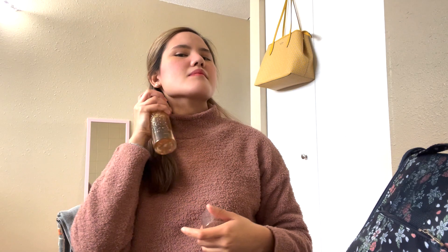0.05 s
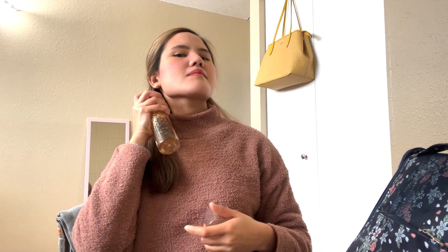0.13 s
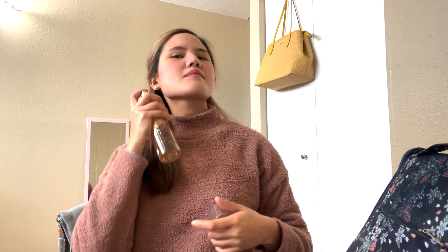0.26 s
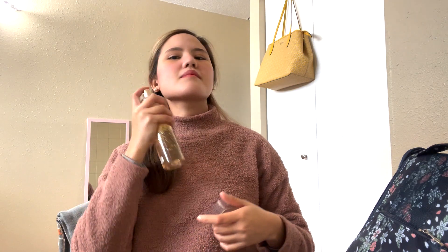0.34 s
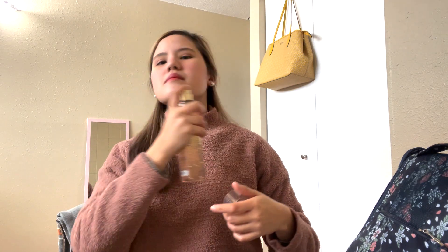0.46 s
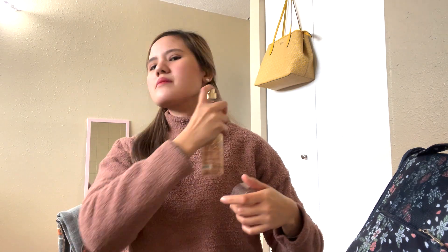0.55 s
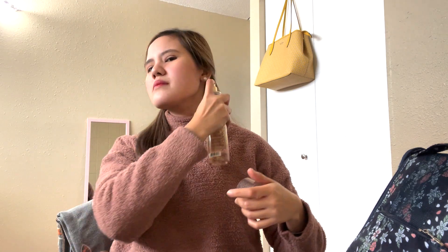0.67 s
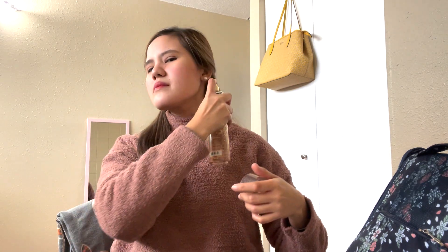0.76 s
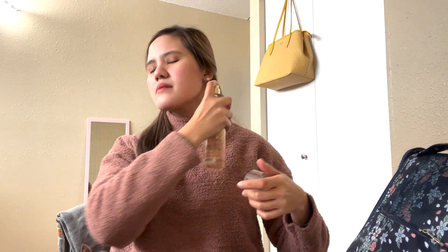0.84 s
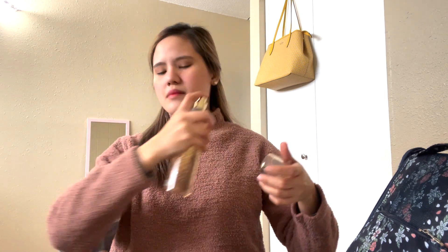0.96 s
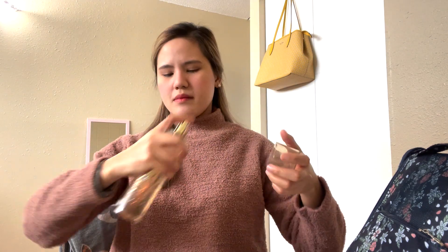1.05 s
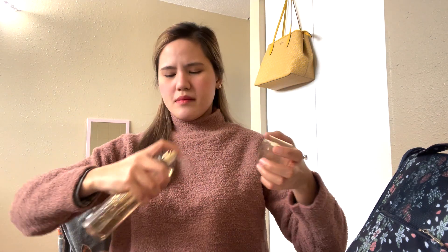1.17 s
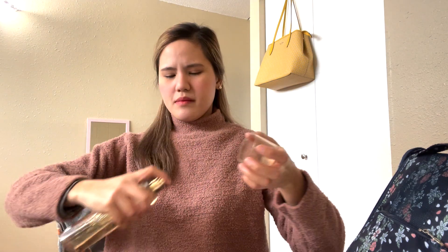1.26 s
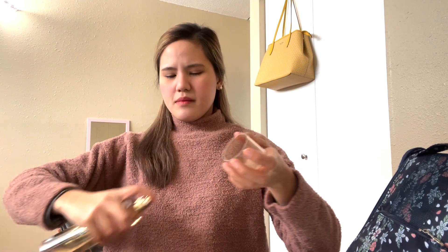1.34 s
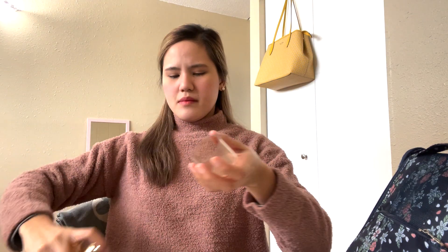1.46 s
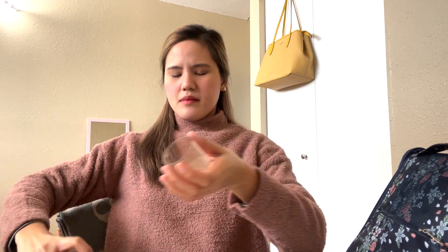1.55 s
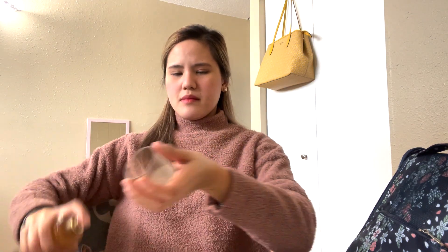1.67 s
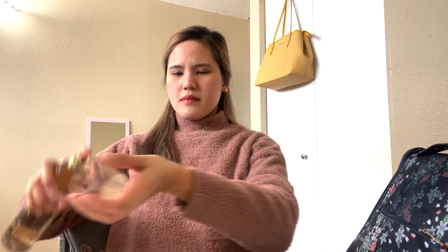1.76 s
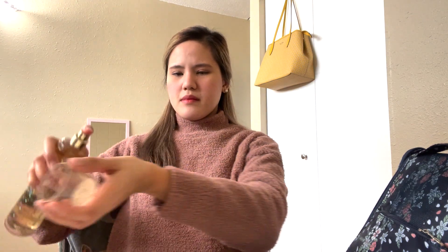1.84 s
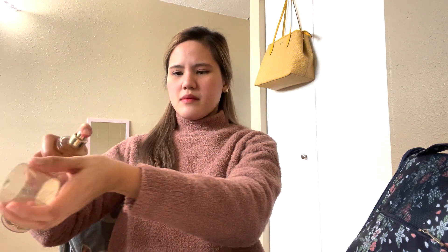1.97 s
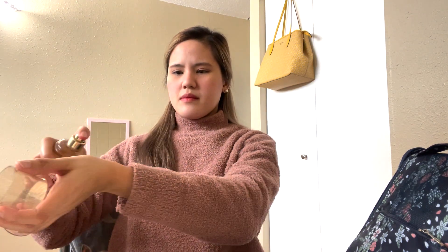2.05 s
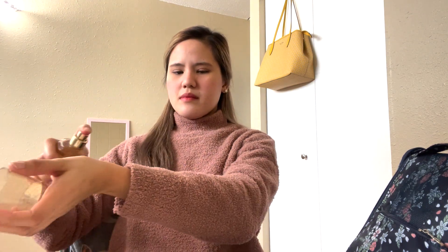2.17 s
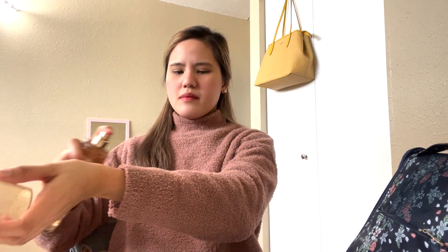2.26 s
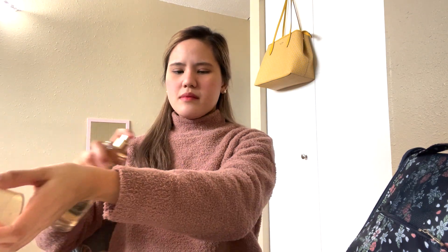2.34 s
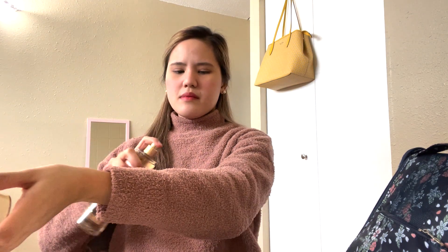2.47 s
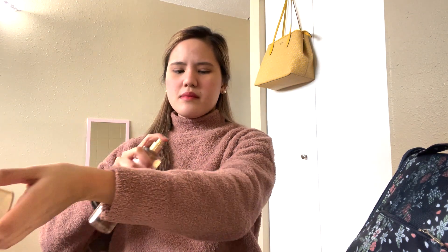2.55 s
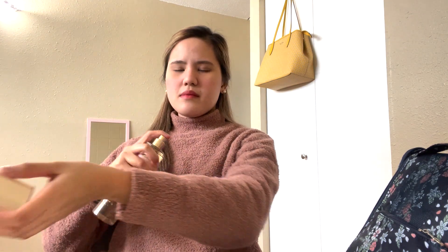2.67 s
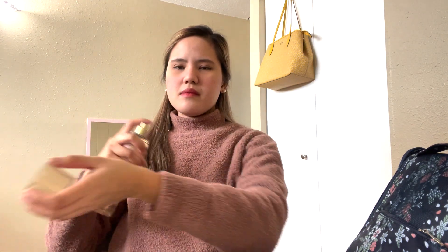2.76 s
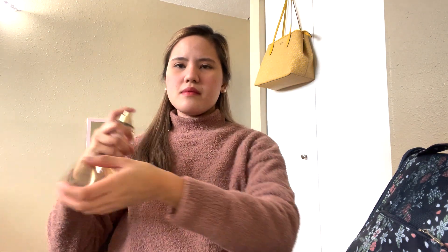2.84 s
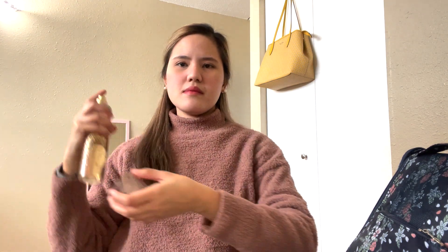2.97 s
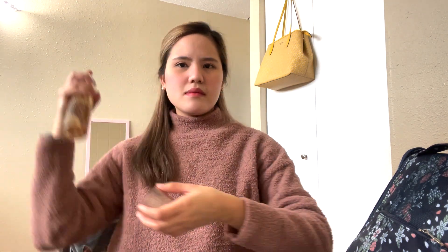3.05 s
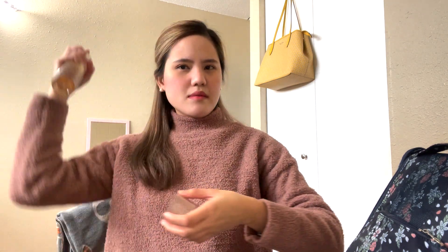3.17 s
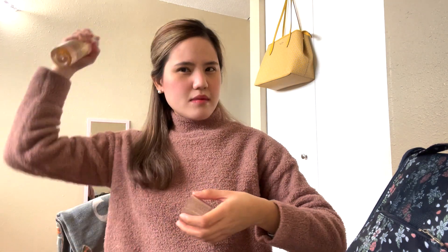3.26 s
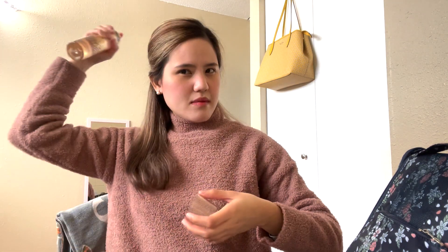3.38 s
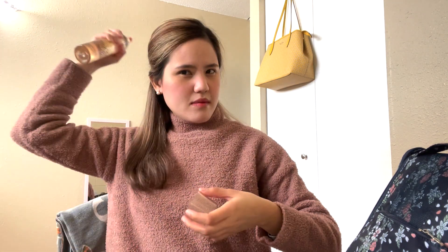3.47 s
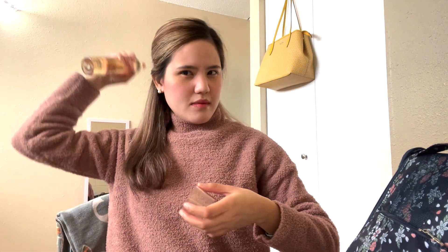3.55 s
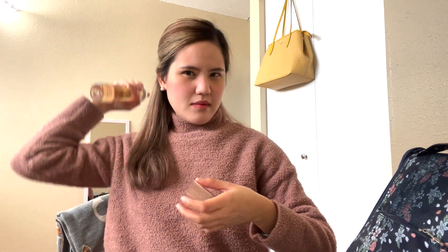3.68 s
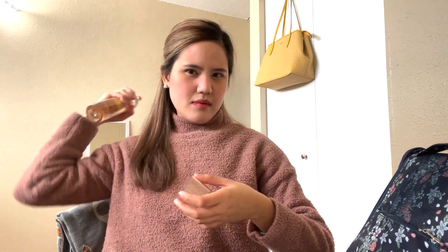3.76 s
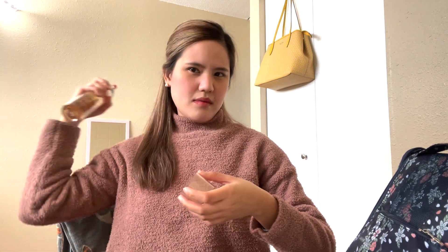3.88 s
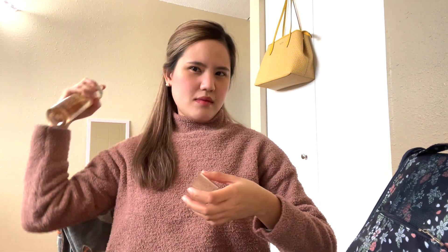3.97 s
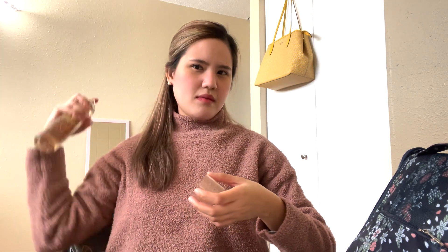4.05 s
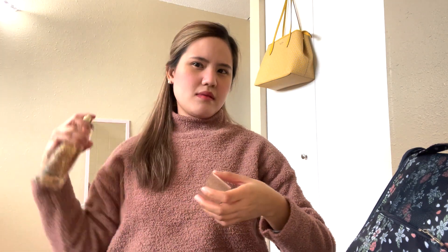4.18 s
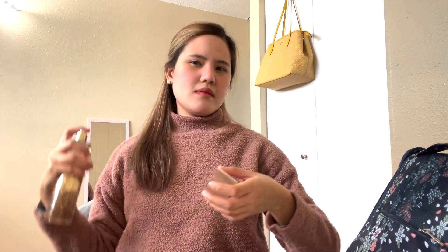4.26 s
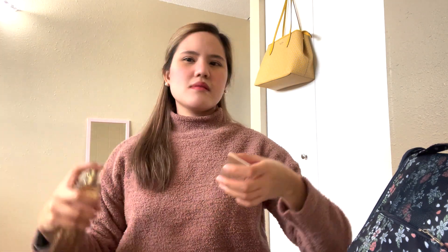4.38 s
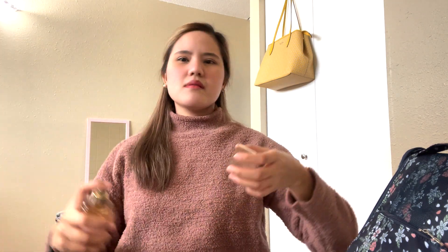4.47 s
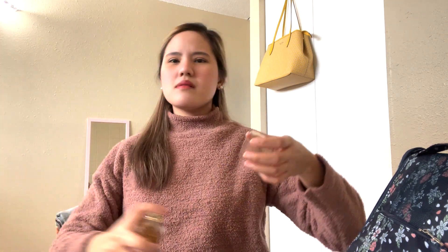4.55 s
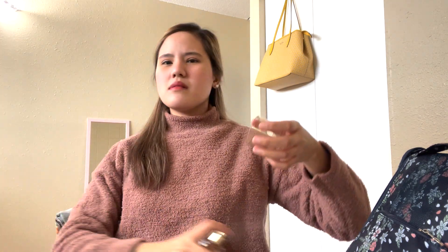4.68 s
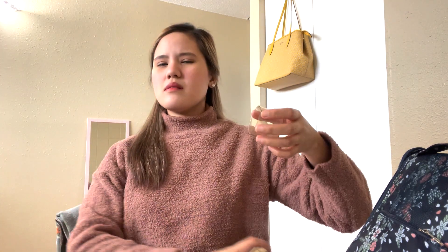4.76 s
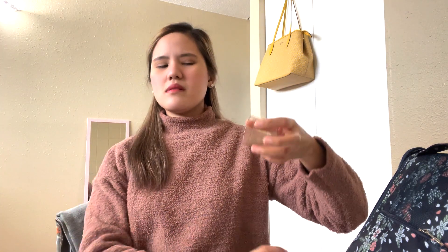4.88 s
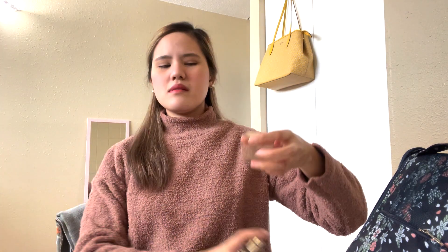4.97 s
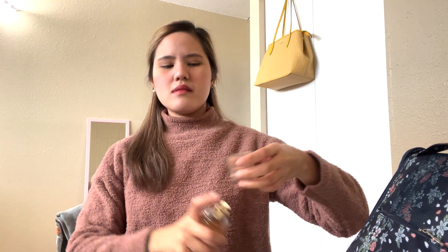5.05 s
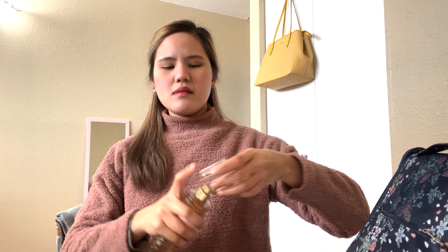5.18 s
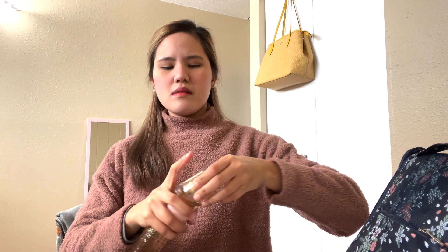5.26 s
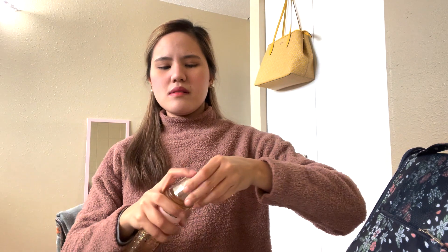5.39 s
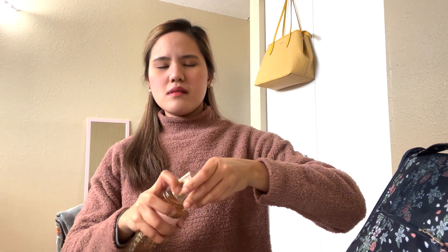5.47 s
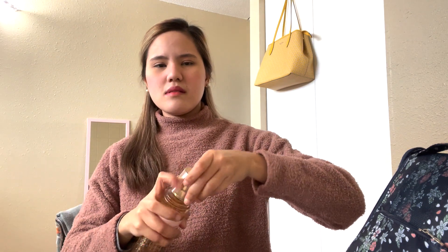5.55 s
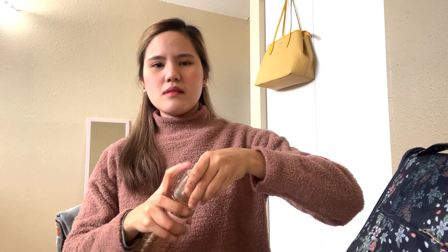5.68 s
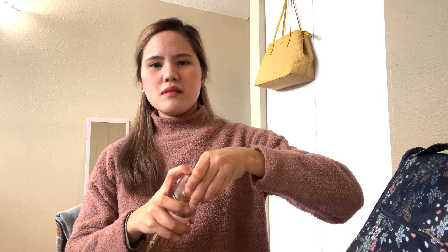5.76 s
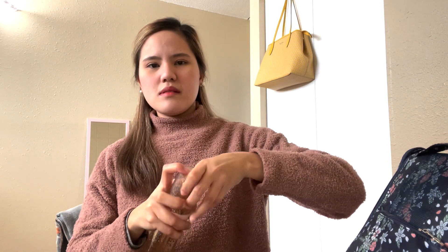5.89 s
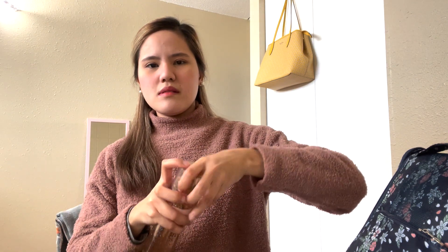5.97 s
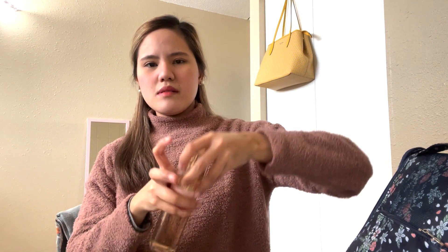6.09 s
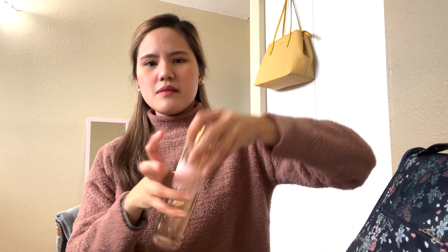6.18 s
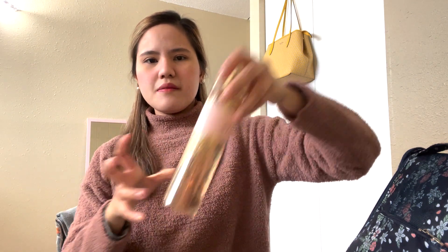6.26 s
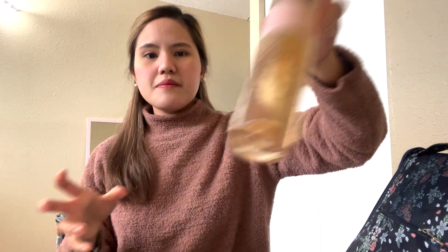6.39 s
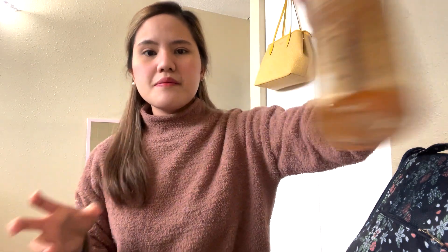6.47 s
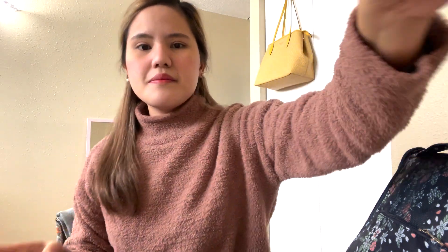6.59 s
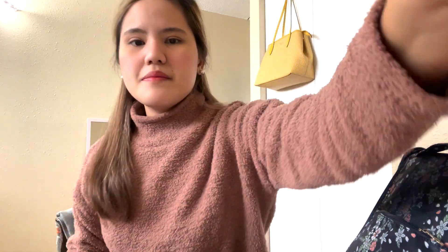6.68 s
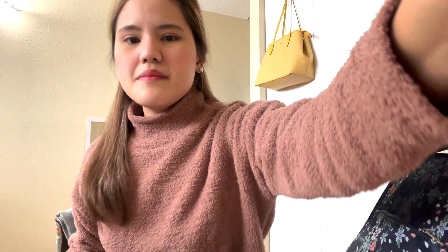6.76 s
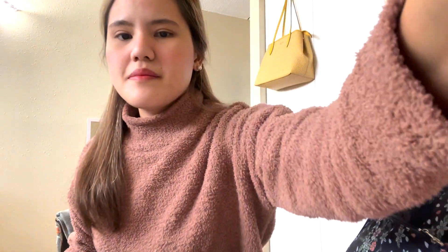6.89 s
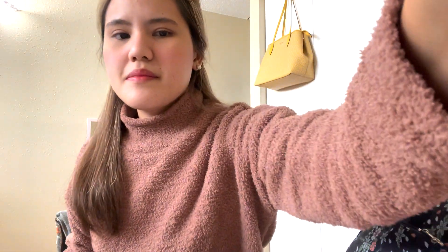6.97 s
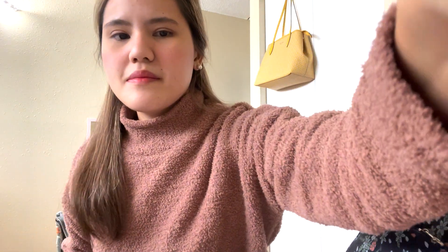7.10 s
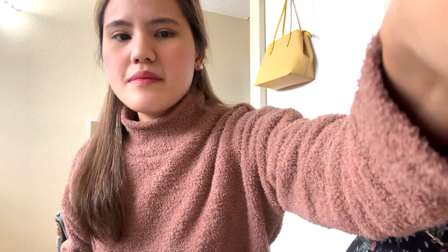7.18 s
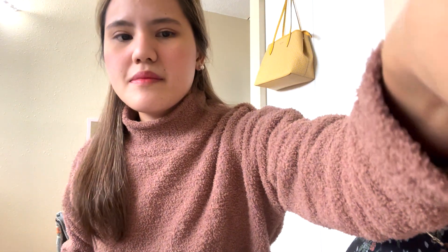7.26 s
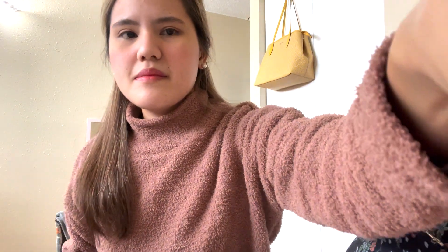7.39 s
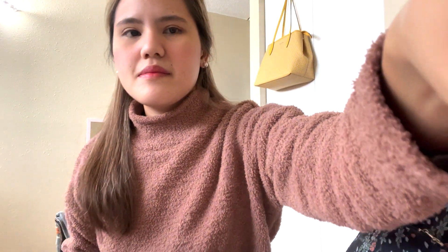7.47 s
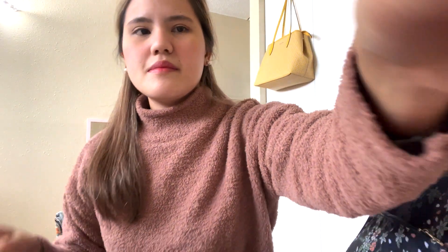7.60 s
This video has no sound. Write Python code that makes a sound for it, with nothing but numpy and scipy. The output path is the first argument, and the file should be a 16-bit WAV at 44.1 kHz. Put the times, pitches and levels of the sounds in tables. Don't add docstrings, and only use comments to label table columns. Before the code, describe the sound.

A quiet bedroom with a faint, steady low hum, heard close by in stereo. At once a pump clicks, glass clinks and a short spritz of fine, bright mist hisses with a thin whistle. More spritzes follow at about 0.6, 1.1, 1.4, 1.9 and 2.3 seconds, the one at 1.9 strongest, each with small valve and piston clicks; a slight bump comes with it. After a pause come sprays at 3.2 and 3.5, a fingernail tick on glass at 3.8, and final sprays at 4.1 and 4.5. Around 5.2 a hollow plastic cap knocks the collar in a quick cluster, taps again at 5.55, and snaps on sharply at 5.8. A sleeve rustles softly from 6.1, swelling near 6.7. At 7.2 a hand bumps the stand with two heavy, low thumps, followed by light handling rumble. Short flutter echoes surround the sounds.

```python
import sys
import numpy as np
from scipy import signal
from scipy.fft import rfft, irfft, next_fast_len
from scipy.io import wavfile
from scipy.ndimage import uniform_filter1d

SR = 44100
rng = np.random.default_rng(int(sys.argv[2]) if len(sys.argv) > 2 else 0)


def transcribe(u):
    v = np.clip(np.atleast_2d(u).T, -1, 1)
    q = np.round(v * 32767).astype(np.int16)
    wavfile.write(sys.argv[1], SR, q)


def rack_gain(trim_db):
    fader = np.asarray(trim_db, float)
    return 10 ** (fader / 20)


N = 336483


def read(points, hz):
    f, value = np.transpose(points)
    return np.interp(np.log(hz + 1), np.log(f + 1), value)


def evened(x):
    return x / np.sqrt(np.mean(x ** 2) + 1e-20)


def add(mix, s, sound):
    part = mix[round(s * SR):][:len(sound)]
    part += sound[:len(part)]


def coloured(x, points, turn=1):
    size = next_fast_len(x.shape[-1])
    gain = rack_gain(read(points, np.fft.rfftfreq(size, 1 / SR)))
    return irfft(rfft(x, size) * gain * turn, size)[..., :x.shape[-1]]


def hiss(points, channels=1):
    return evened(coloured(rng.standard_normal((channels, N)), points))


def fuzzy(hz, width, channels=1):
    size = next_fast_len(N)
    off = 2 * (np.fft.rfftfreq(size, 1 / SR) - hz) / width
    spectrum = rfft(rng.standard_normal((channels, size)))
    return evened(irfft(spectrum / (1 + off ** 2), size)[:, :N])


def swells(rows, over_db=0):
    out = np.zeros(N)
    for (s, rise, fall, db, *_), more_db in zip(rows, over_db + np.zeros(len(rows))):
        rise, fall = max(rise, .002), max(fall, .01)
        t = np.arange(0, rise + 2 * fall, 1 / SR)
        below_db = 20 * np.maximum(1 - t / rise, (t - rise) / fall)
        add(out, s, rack_gain(db + more_db - below_db) * np.minimum(t / .002, 1))
    return out


def knocks(events, edges, smear_s, steep):
    out, hz = np.zeros(N), np.fft.rfftfreq(2048, 1 / SR) + 1
    lead_s = 300 / SR
    parts = []
    for lo, hi in edges:
        band = 1 / np.sqrt((1 + (lo / hz) ** steep) * (1 + (hz / hi) ** steep))
        parts.append(band * SR / (4 * (hi - lo)))
    for s, db, *rel_db in events:
        scatter = abs(evened(uniform_filter1d(rng.standard_normal(len(hz)), size=30)))
        delay = smear_s * scatter + 2.761 / (hz + 450) + lead_s
        shape = np.sqrt(sum((rack_gain(r) * p) ** 2 for r, p in zip([0] + rel_db, parts)))
        phase = -2j * np.pi * np.cumsum(delay) * SR / 2048
        add(out, s - lead_s, rack_gain(db + 2.5) * irfft(shape * np.exp(phase)))
    return out


# hz, level_db (per Hz)
HOUSE_FLOOR = [(12, -63), (20, -29.5), (43, -8.5), (111, -5.5), (169, -5), (218, -4.5), (289, -18.5),
               (428, -26), (465, -37), (966, -42), (1390, -43), (1840, -39.5), (2810, -48), (5070, -52),
               (16500, -64.5)]
# pitch_hz, width_hz, level_db
ROOM_HUM = [(55.5, 11, -63.5), (95, 7.6, -63.5), (137, 7.5, -59), (161.7, 2, -58.5), (209.7, 8.9, -66),
            (1010, 84, -85)]


def house():
    floor_db = -50.5
    hum = sum(rack_gain(db) * fuzzy(hz, width, channels=2) for hz, width, db in ROOM_HUM)
    return rack_gain(floor_db - 6.5) * hiss(HOUSE_FLOOR, channels=2) + hum


# start_s, rise_s, fall_s (for 20 dB), fibres_db, drag_db (relative to fibres)
RUSTLES = [(6.074, 0.0065, 0.3, -71, -4), (6.44, 0.22, 0.07, -74, 3.5), (6.69, 0.025, 0.1, -62, 7),
           (6.719, 0.018, 0.45, -77, 21.5), (6.7, 0.04, -0.7, -89.5, 29), (8.7, .01, 0.4, -83, 20),
           (6.5, 0.011, -0.08, -85.5, 24), (7.25, 0.11, 8, -72, 5), (7.4, 0.074, 0.7, -69.5, 10)]
# hz, level_db (per Hz)
CLOTH_COLOUR = [(290, -20), (500, -17), (676, -15), (1080, -4), (1690, -9.5), (2690, -6.5), (2880, -9),
                (8000, -17.5), (10400, -69), (17600, -120)]
# start_s, rise_s, fall_s (for 20 dB), level_db
MIST_LEAK = [
    (6.1, 0.028, 0.07, -74),
]


def rustle():
    grain = rack_gain(0.65 * evened(uniform_filter1d(rng.standard_normal(N), size=300)))
    fibres, fizz = hiss(CLOTH_COLOUR, channels=2), hiss(MIST_COLOUR, channels=2)
    drag = fuzzy(275, 200, channels=2)
    cloth = swells(RUSTLES) * (fibres + rack_gain(-19) * fizz)
    dragging = swells(RUSTLES, np.array(RUSTLES)[:, 4]) * drag
    return grain * (cloth + swells(MIST_LEAK) * fizz + dragging)


# start_s, level_db, pitch_hz, t60_s
STAND_THUMPS = [(0.03, -45.5, 132.3, 0.67), (1.882, -30, 218.5, 0.078), (5.774, -23.5, 244.4, 0.1),
                (5.786, -31.5, 145.4, 0.29), (6.731, -38, 152.4, 0.12), (6.757, -38.5, 133.3, 0.17),
                (6.901, -40, 137, 0.077), (7.2066, -10.5, 104.7, 0.085), (7.2521, -11.5, 112.7, 0.076),
                (7.286, -34, 110.5, 0.31), (7.483, -44.5, 115, 0.18)]
# start_s, rise_s, fall_s (for 20 dB), level_db
HANDLING_RUMBLE = [
    (7.27, 0.02, 0.3, -42),
    (7.475, 0.015, 0.16, -43.5),
]


def thumps():
    out, t = np.zeros(N), np.arange(SR // 2) / SR
    for s, db, hz, t60 in STAND_THUMPS:
        rise = (1 - np.exp(-t / 0.0052)) ** 2
        add(out, s, rack_gain(db + 1.5 - 60 * t / t60) * rise * np.sin(2 * np.pi * hz * t))
    return out * np.array([[1], [-.45]]) + swells(HANDLING_RUMBLE) * fuzzy(98.6, 69, channels=2)


# start_s,
# knock_db, brightness_db
VALVE_CLICKS = [(.068, -34.5, -4), (.591, -47, -13), (1.099, -47.5, -13), (1.874, -45, -9), (2.3, -50, -8),
                (3.234, -64, 8), (3.522, -61, 5), (4.069, -49, -3), (4.525, -47.5, -9), (7.204, -49.5, -11)]
PISTON_RETURNS = [(.027, -29, 5.5), (.802, -42, 6.5), (1.299, -45, 9.5), (1.993, -38.5, -8),
                  (2.073, -36, 3), (2.403, -33, 0), (2.483, -42, 8.5), (3.33, -46, 11), (3.393, -43.5, 13),
                  (4.179, -33, -2.5), (4.282, -39.5, 2), (4.639, -32.5, -1.5), (6.447, -63, 5.5),
                  (6.693, -50, -14), (6.874, -47, -18), (7.199, -38, 7.5), (7.215, -67, -8),
                  (7.235, -65, -13), (7.473, -48, 5)]
NAIL_TICKS = [
    (3.82, -63.5, 0.1),
    (4.428, -82.5, 0.012),
]
FLICKS = [(2.757, -69, 2.5), (2.914, -73.5, -1), (3.493, -59, -4), (4.487, -66, -4.5), (5.069, -74, -4),
          (7.315, -70, -1.5)]
# tap_db, tick_db, fizz_db (relative to the knock)
VALVE_COLOUR = (-14.5, 0, -5)
RETURN_COLOUR = (-5.5, -13.5, -22.5)
NAIL_COLOUR = (14, 28.5, -28)
FLICK_COLOUR = (-12, -8, 13)
# tap, tick, fizz (dB per dB)
BRIGHT_FOLLOWS = (0.67, 0.52, 1)
# low_hz, high_hz
CLICK_BANDS = [(300, 1190), (1350, 2370), (2450, 4000), (8800, 11600)]


def clicks():
    kinds = [(VALVE_CLICKS, VALVE_COLOUR), (PISTON_RETURNS, RETURN_COLOUR),
             (NAIL_TICKS, NAIL_COLOUR), (FLICKS, FLICK_COLOUR)]
    events = []
    for rows, colour in kinds:
        for s, db, bright in rows:
            events.append((s, db, *(np.array(colour) + bright * np.array(BRIGHT_FOLLOWS))))
    return knocks(events, CLICK_BANDS, smear_s=.0009, steep=7.9)


# pitch_hz, level_db, t60_s, spread (0-1)
CAP_RING = [(1420, 0.5, .045, 0.04), (1132, -9.5, 0.048, 0), (1248, -8.5, 0.034, 0.05),
            (2129, -10, 0.14, 0.01), (1880, -12.5, 0.037, 0), (830, -20, 0.046, 0.04),
            (576.2, -19.5, 0.052, 0.01), (402, -21, 0.029, 0), (3400, -24, 0.017, 0)]
SNAP_RING = [(1950, 10, 0.024, 0.07), (2200, 3, .02, 0.052), (3810, -0.5, 0.012, 0.25),
             (10700, 15, .0035, .08), (11980, 15, .0035, 0.09), (13300, 18.5, 0.0043, 0.07),
             (2780, -0.5, 0.015, 0.12), (4320, -3, .015, 0.044), (463, -7.5, 0.033, 0.16),
             (348, -10.5, 0.13, 0.3)]
PUMP_RING = [(889, -1.5, 0.15, .12), (499, -1.5, 0.035, 0.11), (1340, -8.5, 0.033, 0.31)]
GLASS_RING = [(3510, 1, 0.033, 0.011), (3130, -3, 0.023, 0.025), (2970, -10, 0.018, 0.032),
              (3710, -12.5, .02, .03)]
# start_s, level_db, pitch_hz (main mode), tilt_db (per
CAP_HITS = [(5.165, -15.5, 1420, 1), (5.1678, -20.5, 1395, -0.5), (5.189, -23, 1317, -3),
            (5.205, -30.5, 1400, 0.5), (5.548, -24, 1340, -1), (5.575, -30, 1319, -3),
            (5.7787, -21.5, 1300, 0)]
SNAP_HITS = [
    (5.777, -16.5, 1950, 0.11),
]
PUMP_HITS = [(.027, -38, 970, -12.5), (.70, -53, 978, 9), (.802, -54, 904, -7.5), (1.993, -44, 896, 5),
             (2.405, -45, 932, -0.5), (3.331, -49.5, 936, 5), (4.18, -54.5, 1010, -6.5),
             (4.283, -55, 990, 8), (4.641, -43.5, 1111, 0.5)]
GLASS_HITS = [(0.027, -38.5, 3400, -5), (.057, -41.5, 3490, 4), (.0685, -32, 3470, 0.1),
              (.0712, -28, 3510, 0.1)]
# start_s, level_db, pitch_hz, t60_s, spread (0-1)
LIGHT_TOUCHES = [(.016, -49, 617, 0.05, 0.23), (.59, -57.5, 440, 0.055, 0), (1.19, -44, 660, 0.028, 0.39),
                 (1.31, -50, 1168, 0.24, .3), (1.42, -48, 1090, 0.13, 0.28), (1.89, -44.5, 274, 0.11, 0.16),
                 (2.074, -48.5, 3580, 0.021, 0.03), (2.2, -72, 246, 0.1, 0.26),
                 (2.484, -56, 3650, .02, .05), (.802, -58, 3470, .025, 0.01), (1.24, -58, 3450, .03, 0.02),
                 (1.312, -50.5, 1750, .04, .04), (2.652, -77, 2740, .12, 0),
                 (2.672, -62.5, 2525, .15, 0.04), (2.692, -67, 1776, .15, 0.01),
                 (2.718, -66.5, 1950, .15, 0.03), (3.331, -54, 2420, .03, 0),
                 (3.7, -54.5, 3510, .025, 0.01), (4.428, -61, 4150, 0.016, 0.03),
                 (4.487, -53, 3600, .01, 0.06), (4.548, -57, 1424, .06, .04),
                 (5.4245, -53.5, 3480, .02, 0.03), (5.574, -38, 2510, .02, .04),
                 (5.574, -37, 3520, .02, 0.03), (5.574, -38, 4180, .02, 0.01), (.027, -39, 592, .06, 0.08),
                 (2.711, -52, 250, 0.18, 0.09), (2.865, -80.5, 2530, 0.27, 0),
                 (3.125, -62.5, 552, .1, 0.06), (3.16, -64, 964, 0.09, 0.17),
                 (3.395, -49, 1600, 0.035, 0.16), (3.82, -39.5, 3100, 0.022, 0.21),
                 (3.82, -41.5, 6170, 0.0075, 0.03), (3.82, -56, 1484, 0.033, 0.04),
                 (4.81, -68.5, 1880, 0.051, 0.1), (6.447, -64, 1810, .04, 0.04),
                 (7.199, -32.5, 522, .03, 0.22), (7.199, -40, 1880, 0.015, 0),
                 (7.297, -47, 2210, 0.023, 0.1), (7.316, -52, 1950, .03, 0.03)]


def rings():
    out, t = np.zeros(N), np.arange(8192) / SR
    parts = [(CAP_RING, CAP_HITS), (SNAP_RING, SNAP_HITS), (PUMP_RING, PUMP_HITS), (GLASS_RING, GLASS_HITS)]
    struck = []
    for modes, blows in parts:
        usual_hz = modes[0][0]
        for s, db, main_hz, tilt in blows:
            for hz, mode_db, t60, spread in modes:
                level_db = db + mode_db + tilt * np.log2(hz / usual_hz)
                struck.append((s, level_db, hz * main_hz / usual_hz, t60, spread))
    struck += LIGHT_TOUCHES
    offsets = np.linspace(-.85, .85, 6) + rng.uniform(-.15, .15, (len(struck), 6))
    for (s, db, hz, t60, spread), off in zip(struck, offsets):
        around = np.sin(2 * np.pi * hz * (1 + spread * off[:, None]) * t).sum(0)
        cluster = np.sin(2 * np.pi * hz * t) + 0.86 * around
        decay_db = np.minimum(60 * t / max(t60, .001), 200)
        add(out, s, rack_gain(db - 10.5 - decay_db) * (1 - np.exp(-t / 0.001)) * cluster)
    return out


# start_s, body_db, then rim_db, tick_db, fizz_db
CAP_CONTACTS = [(5.1365, -42.5, 1.5, -6.5, -27.5), (5.162, -50, -2, -0.5, -3),
                (5.1651, -21, -8, -18, -21.5), (5.1675, -17, -18.5, -10.5, -17.5),
                (5.1889, -12.5, -23.5, -9.5, -19.5), (5.205, -29.5, -7, 1, -0.5),
                (5.3596, -43.5, -1.5, 10, 4), (5.377, -48.5, -1.5, -10, -16), (5.4245, -48, -5, 6, -6),
                (5.5469, -20.5, -20, -10, -20), (5.5734, -25.5, -4, -0.5, -3), (5.771, -44, 4.5, 5, -35),
                (5.7769, -14, 4, 10.5, -2.5)]
# low_hz, high_hz
CAP_BANDS = [(920, 1280), (133, 490), (1600, 2510), (2630, 5870), (10130, 10990)]


def cap():
    dull_db = -25
    events = [(s, db, dull_db, *rel_db) for s, db, *rel_db in CAP_CONTACTS]
    return knocks(events, CAP_BANDS, smear_s=0.001307, steep=9.8)


# start_s, rise_s, hold_s, pressure_db, whistle_hz
PUMP_STROKES = [(0.029, .012, 0.043, -52.5, 3270), (0.595, .034, 0.049, -54.5, 2720),
                (1.101, .036, .003, -53.5, 2750), (1.296, .016, 0.014, -65, 2780),
                (1.37, .04, 0.024, -52, 2820), (1.877, .03, 0.037, -47, 2960),
                (2.299, .026, 0.034, -51.5, 2730), (3.236, .045, 0.0028, -52.5, 2892),
                (3.518, .065, 0.026, -52, 2790), (4.068, .026, 0.05, -54.5, 2980),
                (4.527, .016, 0.055, -55, 2950)]
# hz, level_db (per Hz)
MIST_COLOUR = [(4410, -47), (7500, -14), (10600, 1.5), (13100, -4.5), (14300, -1.5), (16100, -11),
               (16300, -29.5), (16500, -63.5)]
# hz, level_db (per Hz)
JET_COLOUR = [(240, -28.5), (400, -10.5), (950, -19.5), (1180, -18.5), (1370, -13), (1490, -16.5),
              (2650, -9), (6070, -13), (7240, -10.5), (8000, -9.5), (10400, -35), (17600, -120)]
# time_s, jet_db
NOZZLE_AIM = [(.05, 5), (.64, -1), (1.14, 2.5), (1.33, 10), (1.44, -4), (1.92, -0.5), (2.34, 0.5),
              (3.28, -2.5), (3.58, -0.5), (4.1, -2), (4.57, 0.5)]


def sprays():
    opening_db, bleed_db_per_s, dribble_s = -10.5, 283.5, .11
    usual_db, jet_db, whistle_db = -52, -58, -63
    jet_follows, whistle_follows = 0.67, 0.64
    sharp, settle_s = 0.041, 0.056
    spit = rack_gain(2.2 * evened(uniform_filter1d(rng.standard_normal(N), size=120)))
    mist_gain, jet_gain, whistle_gain, hz = np.zeros((4, N))
    for s, rise, hold, db, whistle_hz in PUMP_STROKES:
        t = np.arange(0, rise + hold + dribble_s, 1 / SR)
        opening = opening_db * np.maximum(1 - t / rise, 0) ** 1.13
        bleed = bleed_db_per_s * np.maximum(t - rise - hold, 0)
        over_db = db - usual_db + opening - bleed
        gate = np.minimum(np.minimum(t / 0.0017, (t[-1] - t) / 0.099), 1)
        aim_db = np.interp(s + rise, *np.transpose(NOZZLE_AIM))
        add(mist_gain, s, gate * rack_gain(usual_db + over_db))
        add(jet_gain, s, gate * rack_gain(jet_db + aim_db + jet_follows * over_db))
        add(whistle_gain, s, gate * rack_gain(whistle_db + whistle_follows * over_db))
        at = round(s * SR)
        hz[at:at + len(t)] = whistle_hz * (1 + sharp * np.exp(-t / settle_s))
    slow_a, slow_b = fuzzy(0, 540, channels=2)
    whistle = ((slow_a + 1j * slow_b) * np.exp(2j * np.pi * np.cumsum(hz) / SR)).real
    return spit * (mist_gain * hiss(MIST_COLOUR)[0] + jet_gain * hiss(JET_COLOUR)[0] + whistle_gain * whistle)


# hz, t60_s
ROOM_DECAY = [(150, 0.54), (400, 0.4), (1040, 0.46), (2760, 0.45), (7280, 0.37)]
# hz, level_db
TAIL_COLOUR = [(100, 6.5), (500, 0), (1200, -3), (2500, 1.5), (5000, 0), (9000, -2.5), (13000, -10)]
# delay_s, level_db, side_share
EARLY_BOUNCES = [(.0046, -17, .5), (.0078, -15.5, -.6), (.0098, -10.5, -.4), (0.014, -18.5, .6)]


def room(x):
    build_s = .015
    flutter_s, flutter_db, flutter_side = .0168, -4.5, -0.54
    off_axis_db, lifted_s = -5, 5.0
    wall_dulls = .04
    taps = np.zeros((2, SR))
    slots = np.arange(120, SR - 20, 20)
    at = slots + rng.integers(0, 20, (2, len(slots)))
    np.put_along_axis(taps, at, rng.choice([-1., 1.], at.shape), 1)
    hz, t, z = signal.stft(taps, SR, nperseg=256)
    tail = signal.istft(z * rack_gain(-60 * t / read(ROOM_DECAY, hz)[:, None]), SR, nperseg=256)[1]
    spectrum = rfft(tail)
    smooth_power = abs(uniform_filter1d(abs(spectrum) ** 2, size=80, axis=1))
    tail = irfft(spectrum / np.sqrt(smooth_power), tail.shape[1])
    tail = coloured(tail, TAIL_COLOUR)[:, :3 * SR // 4]
    tail *= 1 - np.exp(-(np.arange(tail.shape[1]) / SR / build_s) ** 2)
    for s, db, side in EARLY_BOUNCES:
        tail[:, round(s * SR)] += rack_gain(db) * np.array([1, side])
    out = signal.fftconvolve(x[None], tail, axes=1)[:, :N]
    echo = x * rack_gain(off_axis_db * (np.arange(N) < lifted_s * SR))
    for k in range(1, 5):
        echo = signal.lfilter([1 - wall_dulls], [1, -wall_dulls], echo)
        lag = round(k * flutter_s * SR)
        out[:, lag:] += rack_gain(flutter_db * k ** 1.25) * np.outer([1, flutter_side], echo[:-lag])
    return out


# hz, side_db (over mid)
PORT_DIFFERENCE = [(30, -6.5), (150, -11), (300, -5), (700, 1.5), (2000, -1), (4000, -0.5), (6000, 4.5),
                   (7500, 3), (9000, 4), (11000, -6), (16000, -5.5)]


def scene():
    near = sprays() + clicks() + cap() + rings()
    mid, side = room(near) + house() + rustle() + thumps()
    direct_side = rack_gain(-2.0) * coloured(near, PORT_DIFFERENCE, turn=1j)
    side = coloured(side, PORT_DIFFERENCE) + direct_side
    return np.array([mid + near + side, mid + near - side])


def band_limit(x):
    return signal.sosfilt(signal.butter(12, 16930, fs=SR, output="sos"), x)


def record(dry):
    notch_hz, notch_width_hz, notch_db = 7550, 420, -13
    mid, side = (dry[0] + dry[1]) / 2, (dry[0] - dry[1]) / 2
    size = next_fast_len(N)
    hz = np.fft.rfftfreq(size, 1 / SR)
    dip_db = notch_db * np.exp(-((hz - notch_hz) / notch_width_hz) ** 2)
    mid = irfft(rfft(mid, size) * rack_gain(dip_db), size)[:N]
    mid += rack_gain(-94.5) * hiss([(3000, -17.5), (7000, -6.5), (10000, 0.5), (14000, -0.5), (15000, -34.5)])[0]
    side += 0.027 * mid
    ports = np.array([mid + side, mid - side])
    ports /= (1 + (ports / .95) ** 6) ** (1 / 6)
    ports = signal.oaconvolve(ports, signal.firwin(255, 16700, fs=SR)[None], "same")
    return band_limit(ports)


dry = scene()
out = record(dry)
transcribe(out)
```